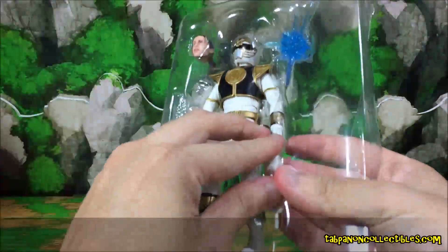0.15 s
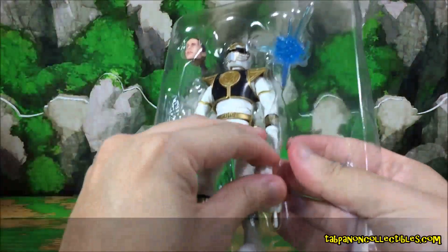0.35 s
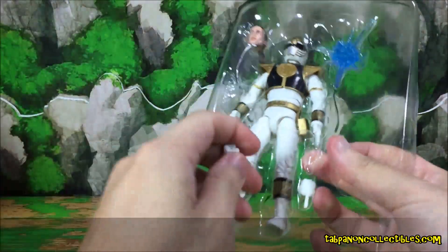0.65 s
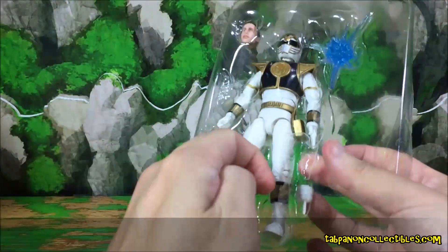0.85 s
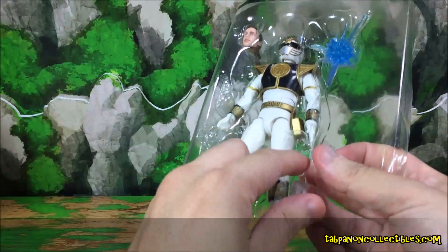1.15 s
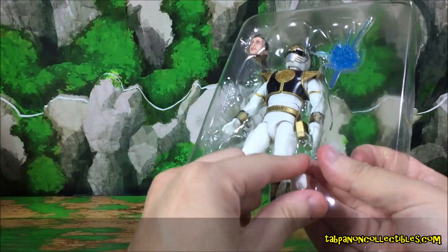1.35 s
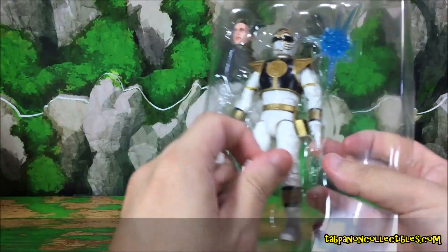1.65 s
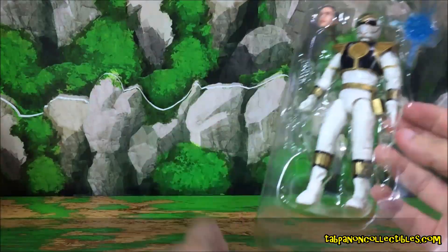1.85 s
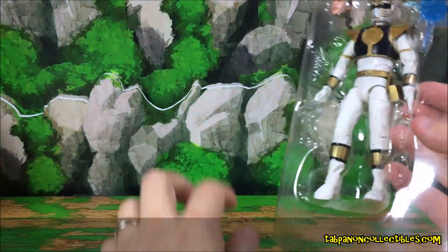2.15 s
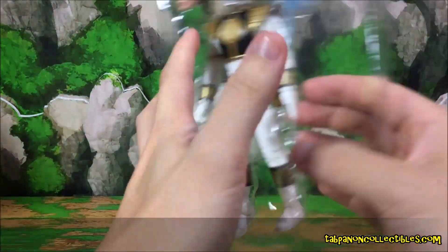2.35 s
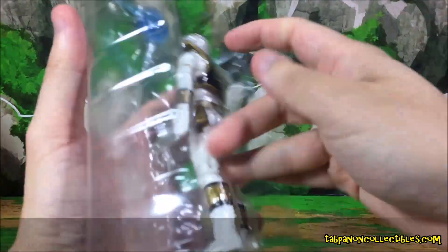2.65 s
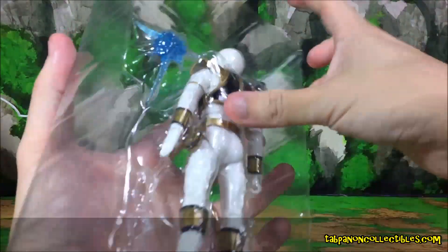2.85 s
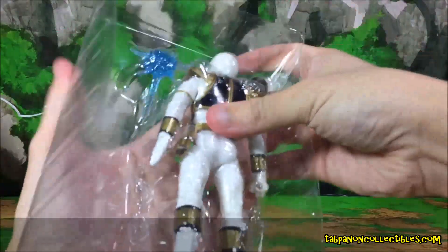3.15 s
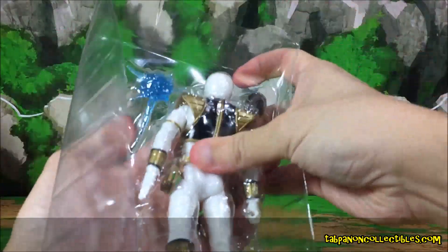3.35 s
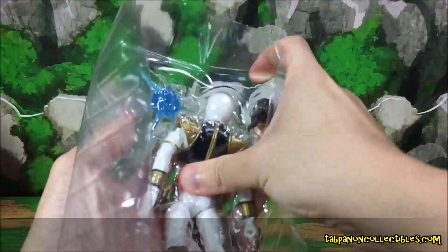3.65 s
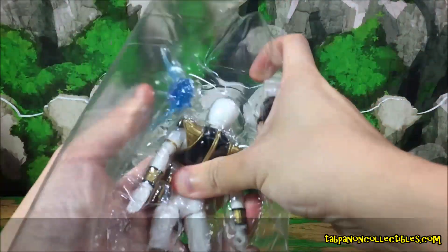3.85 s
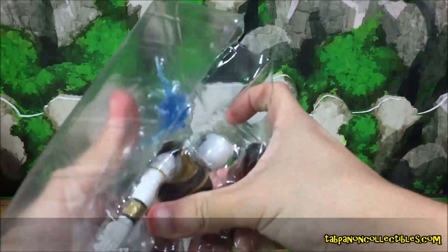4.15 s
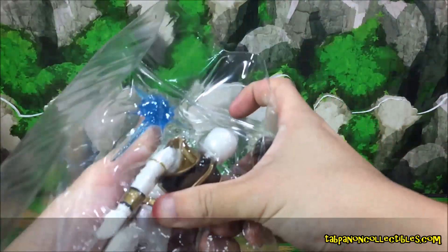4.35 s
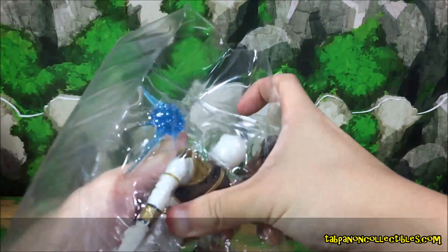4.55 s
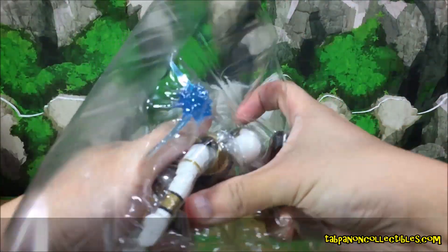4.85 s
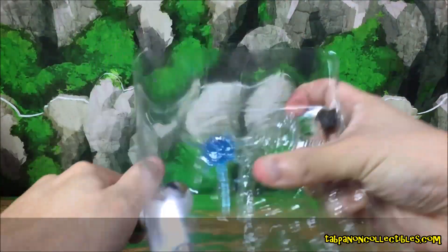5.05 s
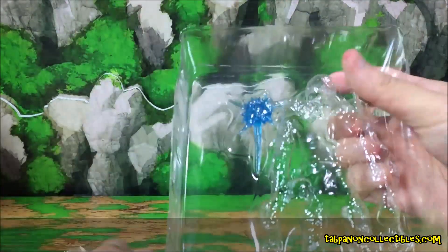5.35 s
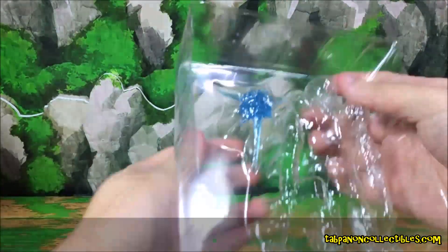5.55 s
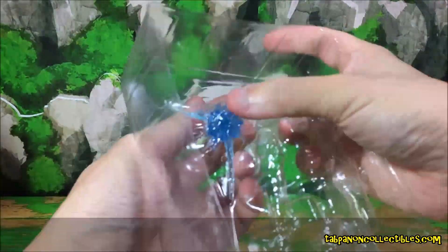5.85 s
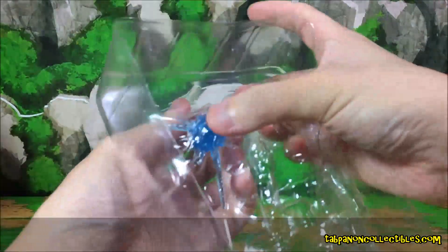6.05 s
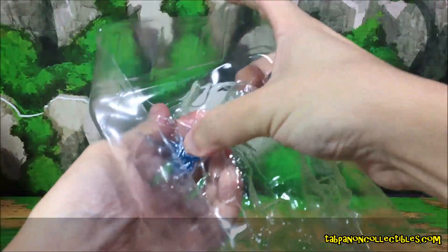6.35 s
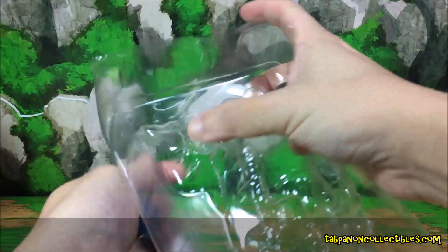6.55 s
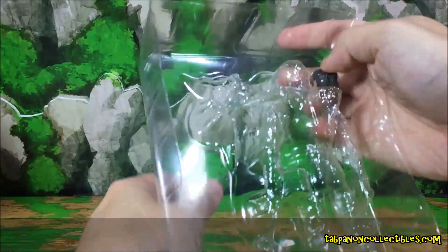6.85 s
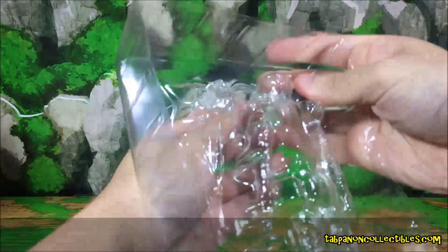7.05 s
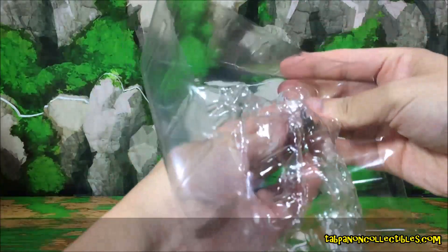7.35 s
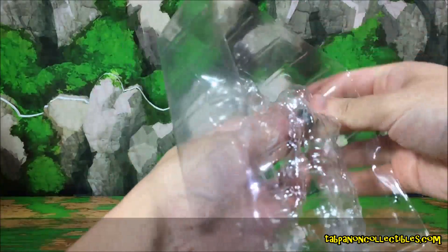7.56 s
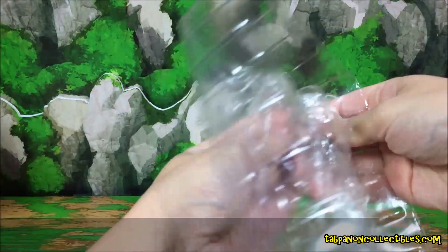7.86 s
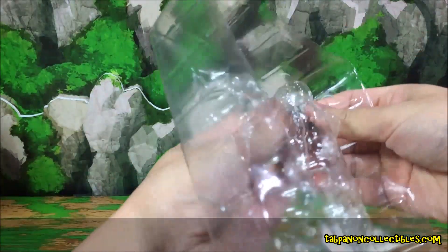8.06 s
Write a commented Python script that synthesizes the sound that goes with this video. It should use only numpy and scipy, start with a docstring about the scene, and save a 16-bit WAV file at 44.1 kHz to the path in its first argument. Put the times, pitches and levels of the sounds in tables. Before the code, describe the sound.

Hands bend a thin moulded plastic tray very close to the microphone in a quiet room. Bright crackles come first, a near lull follows, then scattered ticks and duller pops. Around three and a half to just over five seconds the snaps crowd together, loud and hollow, with low thumps. Afterwards separate sharp pops and small crackles continue to the end.

```python
"""A thin clear plastic tray, bent by hand close up indoors while a figure is pressed out of it.
Each dent snaps through as a burst of decaying band noise plus a short ring of three close sines.
Random tiny clicks make fine crackle between the snaps; resonators give the tray its hollow pitches.
Low noise thuds as the tray flexes, whole walls thump at low pitches, and a quiet room rumble lies below.
The loudest peaks are pushed into soft overload."""
import sys
import numpy as np
from scipy import signal
from scipy.fft import rfft, irfft
from scipy.io import wavfile

SR = 44100
rng = np.random.default_rng(int(sys.argv[2]) if len(sys.argv) > 2 else 0)


def store_wav(level_fs):
    """Save 16-bit WAV to argv[1]."""
    pcm = np.round(np.clip(np.atleast_2d(level_fs), -1, 1) * 32767)
    wavfile.write(sys.argv[1], SR, pcm.T.astype(np.int16))


N = 361619


def amp(db):
    """Turns dB into gain."""
    return 10 ** (np.asarray(db) / 20)


def rms_one(x):
    """Scales a signal to rms 1."""
    return x / np.sqrt(np.mean(x ** 2) + 1e-20)


def in_time(rows):
    """Draws each column of a timed table as a line with one value per sample."""
    s, *columns = np.transpose(rows)
    return [np.interp(np.arange(N) / SR, s, column) for column in columns]


def at_hz(points, hz):
    """Reads a table along a log-frequency axis."""
    table_hz, values = np.transpose(points)
    return np.interp(np.log(hz), np.log(table_hz), values)


def band(x, low_hz, high_hz):
    """Band-passes a signal."""
    return signal.sosfilt(signal.butter(2, [low_hz, high_hz], "band", fs=SR, output="sos"), x)


def dying(clicks, t60):
    """Starts at every click an envelope that falls 60 dB in t60 seconds."""
    return signal.lfilter([1], [1, -amp(-60 / (t60 * SR))], clicks + 1e-18)


def drift(rate_hz):
    """Slow random wander with rms 1: noise smoothed by two equal poles at rate_hz."""
    step = 40   # samples between the points of the wander
    r = np.exp(-2 * np.pi * rate_hz * step / SR)
    noise = rng.standard_normal(N // step + 2002)
    slow = signal.lfilter([1], [1, -2 * r, r * r], noise)[2000:]   # the run-in is dropped
    return np.interp(np.arange(N) / step, np.arange(len(slow)), rms_one(slow))


def tilt_db(hz, bass_db, treble_db):
    """Large dents sound fuller, small tight ones brighter; the tilt pivots at 2500 Hz."""
    octaves = np.log2(hz / 2500)
    bass = bass_db * np.clip(-octaves / 2.0, 0, 1.3)
    treble = treble_db * np.clip(octaves / 1.62, 0, 1.3)
    return bass + treble


# spectrum shape of the room noise: f/Hz, relative level/dB per Hz
ROOM_SPECTRUM = [(21, -31), (36, -1), (143, -1), (331, -23), (552, -19), (769, -27), (1280, -21),
                 (1650, -31), (3380, -36), (16000, -49)]
ROOM_DB = -53.5   # rms


def room():
    """Steady rumble and faint hiss: white noise shaped by the room's spectrum."""
    hz = np.maximum(np.fft.rfftfreq(N, 1 / SR), 1)
    shaped = irfft(rfft(rng.standard_normal(N)) * amp(at_hz(ROOM_SPECTRUM, hz)), N)
    return amp(ROOM_DB) * rms_one(shaped)


# the hands at work: t/s, fine crackle base level/dB, crackle treble tilt/dB, flexing thud base level/dB
HAND_MOVES = [(0.0, -39, 1, -44), (0.43, -49, 2.5, -63), (0.57, -42, 6.5, -57), (0.82, -60, -3, -53),
              (1.14, -57, -7, -60.5), (1.32, -39, -7, -53), (1.64, -55, -1.5, -61),
              (1.92, -50.5, -2.5, -55), (3.17, -34.5, -8.5, -47.5), (3.42, -24.5, 3.5, -62),
              (3.63, -16, -1.5, -62), (3.81, -31, -3, -44), (4.16, -31, -4.5, -50),
              (4.5, -36.5, -6.5, -45.5), (5.14, -25, -5, -33), (5.27, -45, -21, -38),
              (5.46, -47.5, -2, -56), (5.98, -43.5, -6, -50), (6.6, -38.5, -1, -48.5),
              (6.83, -47, -8.5, -54), (7.06, -40.5, 1.5, -49), (7.24, -36.5, -2, -47),
              (7.6, -41.5, -6.5, -56), (7.9, -51, -9, -50.5), (8.11, -41, -4, -48), (8.2, -49, -3, -46)]


def hands():
    """Moving hands set how much the sheet crackles, how bright that is, and how hard the tray thuds."""
    return in_time(HAND_MOVES)


JOLT_DB, JOLT_T60_S = -39, 0.11   # each snap shakes the whole tray; level relative to the snap


def thuds(level_db, lumpy_db):
    """The whole tray flexes and bumps against the fingers: lumpy low noise, stirred up by every snap."""
    level = amp(level_db) + amp(JOLT_DB) * dying(jolts(), JOLT_T60_S)
    low_noise = rms_one(band(rng.standard_normal(N), 53, 216))
    return level * amp(lumpy_db * drift(15)) * low_noise


def jolts():
    """One click per snap, scaled by the level of the snap."""
    s, snap_db = np.transpose(SNAP_EVENTS)[:2]
    clicks = np.zeros(N)
    clicks[(s * SR).astype(int)] = amp(snap_db)
    return clicks


# extra crackle before and after a snap, level relative to the snap
CREAK_DB, CREAK_T60_S = -19, 0.026
SETTLE_DB, SETTLE_T60_S = -31.5, 0.24


def stress():
    """The sheet is strained just before a dent snaps and settles after it: both free extra creases."""
    creak = dying(jolts()[::-1], CREAK_T60_S)[::-1]   # run backwards, so it swells into the snap
    settle = dying(jolts(), SETTLE_T60_S)
    return amp(CREAK_DB) * creak + amp(SETTLE_DB) * settle


def fine_crackle(level, per_s, spread_db, clump_db):
    """Tiny creases let go at random, in clumps, mostly faint and now and then strong."""
    sizes = amp(spread_db * np.minimum(rng.exponential(1, N), 4))
    born = rng.random(N) < per_s * amp(clump_db * drift(15)) / SR
    return level * sizes * born


# resonances of the hollow shape: f/Hz, width/Hz, mean level of the added mode/dB
HOLLOWS = [(338.6, 32, 4), (560, 99, 6), (903, 200, 4), (1231, 78, 0.5), (1435, 23, 0), (1815, 270, -5.5),
           (3275, 410, -7.5), (5900, 1100, -10.5)]


def tray(x):
    """The moulded hollows lift the same few pitches, each waxing and waning as fingers damp or free it."""
    out = x.copy()
    for hz, width_hz, level_db in HOLLOWS:
        r = np.exp(-np.pi * width_hz / SR)
        feed = (1 - r * r) / 2 * np.array([1, 0, -1])
        feedback = [1, -2 * r * np.cos(2 * np.pi * hz / SR), r * r]
        mode = signal.lfilter(feed, feedback, x)
        out += amp(level_db + 1.2 * drift(5.7)) * mode
    return out


CRACK_DB = 6.5   # crack gain over the snap level
LINGER_DB, LINGER_SPREAD_DB = -12.5, 3   # lingering part relative to the crack, and its chance spread
LINGER_TREBLE_DB, LINGER_PER_TREBLE = -4, -0.047   # it is duller; bright snaps linger less (dB per dB)
PATCH_DB, PATCH_OCTAVES = 4, 0.41   # the crack is strongest around the dent's own pitch
EDGES_HZ = 180 * 2 ** np.arange(0, 6.6, 1 / 3)   # third-octave bands
# colour of the sheet: f/Hz, relative level/dB per Hz
SHEET_SPECTRUM = [(220, -18.5), (400, -18), (700, -13), (1500, -11.5), (3000, -13), (6000, -12.5),
                  (10000, -14), (16000, -18)]
# decay of the crack: f/Hz, T60/s
CRACK_DECAY = [(220, 0.013), (1000, 0.0098), (4000, 0.014), (8000, 0.011), (16000, 0.0054)]
# decay of the lingering part: f/Hz, T60/s
LINGER_DECAY = [(220, 0.12), (1000, 0.088), (4000, 0.095), (16000, 0.072)]
# dents snapping through: t/s, snap level/dB before the part gains, ring f/Hz,
# ring level/dB relative to the snap, bass tilt/dB, treble tilt/dB
SNAP_EVENTS = [(0.0223, -27.5, 950, -6, -4, -17), (0.0573, -34, 9460, -3, 2.5, 13),
               (0.064, -20, 6140, -1, -17, 7), (0.0774, -31, 9280, -3, 6, 14),
               (0.0817, -19.5, 7130, -3, -10, 14.5), (0.0937, -18, 6330, 5, -11.5, 11),
               (0.1116, -25, 4410, 3, -18, 10), (0.121, -33, 5900, -3, -5, 23),
               (0.1483, -24, 6520, -3, -9, 4), (0.1603, -18, 8300, -3, 1, 18),
               (0.17, -31, 2260, -3, -3, -1), (0.2005, -27, 2360, -3, -2, -8),
               (0.2283, -13, 6570, -6, 6, 14), (0.2364, -3.5, 3170, -4, -5.5, 4),
               (0.2647, -10, 1930, -1, 3.5, -16.5), (0.304, -9.5, 4600, -2, 0, 5),
               (0.329, -18.5, 1160, -1, 0.5, -7.5), (0.3377, 1.5, 6000, -2, -16, 2),
               (0.3524, -6, 2790, 1, -18.5, -2), (0.3589, -3, 4100, 5.5, -8, -0.5),
               (0.3912, -19, 6150, 0, -5, 13), (0.4003, -18, 4500, -5, -7.5, -4.5),
               (0.4294, -28, 6630, -3, -7, 19), (0.447, -5, 1320, -3.5, 4, -2),
               (0.459, -21.5, 8730, -3, -11, 4), (0.487, -14, 6100, -7, 1, 0),
               (0.5236, -27, 9500, -1, 5, 20), (0.5336, -27, 3140, -3, 2, -1),
               (0.5438, -7.5, 6200, 2, 3, 18), (0.5508, -13.5, 1290, -7, 6, -23),
               (0.564, -22.5, 9500, -3, 4, -3), (0.5716, -26, 9270, -1.5, 0, 6),
               (0.6053, -29, 4630, -3, 12, -12), (0.6161, -11, 930, -1.5, -7, -1),
               (0.653, -13, 6260, -1, -9, 11), (0.6977, -26, 9420, 0, -2, 4),
               (0.705, -34, 9360, -3, -2, 13), (0.71, -16, 6230, -3, -5, 8),
               (0.7755, -32, 1270, 1, 23, -24), (0.8083, -33.5, 9500, -3, 18, 28),
               (0.8827, -42, 565, 5, 29, -7), (0.9106, -45, 1000, 0, 11, -1),
               (0.9303, -48, 1110, 3, 12, -15), (0.9564, -57, 3040, -3, 2, -10),
               (1.1214, -22, 1320, 5, 5.5, -17), (1.137, -29, 3940, -1, 3, 8),
               (1.157, -32, 6160, -1, 2, 16), (1.1704, -16, 9300, 1, -2, 33), (1.184, -31, 1340, 0, -3, -9),
               (1.1865, -17, 9500, 2, 1, 11), (1.1951, -19, 2460, -8, 1, -7),
               (1.2063, -27.5, 6500, 2, 0, 1), (1.2797, -30, 5570, 4, -10, -10),
               (1.3075, -15.5, 1240, 4, 5, -14), (1.329, -28, 1740, -1, 7, 13),
               (1.346, -28, 8900, 6, 8, 20), (1.373, -25, 4710, -3, -6, 12),
               (1.3772, -28.5, 1450, -6, 11, -11), (1.3906, -18, 6320, 4, -2, 18),
               (1.4327, -19, 1850, -3, -3, -13), (1.443, -5, 7200, -2, -4, -2.5),
               (1.45, -9.5, 5790, -5, -5, 12), (1.4826, -26, 5890, -3, 3, 1),
               (1.4934, -21, 6640, -3, -9, 3), (1.4959, -11.5, 4100, -5, -8, 2.5),
               (1.5039, -15, 5500, 1, -10, 2), (1.521, -18.5, 2590, -6, 4, -15),
               (1.534, -20, 4260, 3, -19, 0), (1.5649, -45, 1540, -3, 4, -11),
               (1.597, -19.5, 1990, -5, 2, -31), (1.6568, -18, 5390, 2, 4, 0),
               (1.667, -22.5, 1260, 1, -5, -1), (1.6736, -17, 3200, 0, -10, 8),
               (1.681, -23, 6640, -1, -15, 6), (1.6953, -8.5, 6350, 7, -15, 7),
               (1.7182, -16.5, 6300, -3, 7, 8), (1.726, -21, 950, 1, 9, 16), (1.743, -17, 6220, -3, -15, 2),
               (1.756, -21, 7280, -6, 0, 5), (1.7631, -17, 8540, -3, 2, 5),
               (1.777, -15.5, 8600, -1, -3, 14), (1.8252, -15, 1900, -6, 5, -14),
               (1.8344, -21.5, 1390, -11, 1, -13), (1.896, -20.5, 6500, 2, -11, 12),
               (1.941, -40, 9600, 1, -9, 25), (1.9917, -20, 6000, -5, 2, 14),
               (2.0527, -32, 3400, -3, -7, -1), (2.0629, -21, 2340, -3, 0, -14),
               (2.0741, -16.5, 1890, -13, -8, -9), (2.1652, -21.5, 1300, 0, -6, -13),
               (2.215, -38, 1950, -1, -11, -11), (2.2232, -25.5, 1980, -3, -17, -10),
               (2.2539, -33.5, 2360, -3, -5, -51), (2.3274, -34, 1980, 0, -8, -13),
               (2.358, -32.5, 1920, -3, -10, -21), (2.3936, -2.5, 2280, -14, 1.5, -11),
               (2.4966, -12, 1380, -6, 10, -15), (2.4992, -12, 594, 6, 12, -5),
               (2.52, -9.5, 1170, -6, 11, -16), (2.5441, -3.5, 980, -6, 0, -18),
               (2.5867, -3.5, 2300, -5, 0.5, 4), (2.6092, -16.5, 1380, -3, 6, -15),
               (2.6728, -1, 2100, -7.5, 1.5, -7), (2.851, -20, 3080, -6, -4, -9),
               (2.8678, -8.5, 2320, -4, -1.5, -7.5), (2.8946, -20, 2110, 2, -2, -33),
               (2.905, -13.5, 960, -7, -2, -25), (2.92, -24, 2250, -1, -14, -15),
               (2.931, -18, 2960, -5, -7, -3), (2.9619, -8, 1800, 5, 1.5, -1),
               (3.0168, -42, 1080, 5, 16, -20), (3.0958, -25, 2350, -3, 8, 0),
               (3.1138, -25, 1440, -5, 5, 4), (3.155, -18, 2070, -3, 2.5, -5),
               (3.1749, -2, 2110, -3.5, 10, 11), (3.1934, -7.5, 2220, -3, 9, 6),
               (3.2331, -18.5, 3530, -8, 1, -3), (3.249, -9.5, 6090, -5, -5, -4),
               (3.2648, -15, 1700, -5, 12, 5), (3.2724, -16.5, 3100, 2, -4, 5),
               (3.3113, -29, 9400, -3, -5, 8), (3.3237, -7.5, 2140, -1, -2.5, 1.5),
               (3.3373, -16, 6830, -1, -15.5, 38), (3.3594, -6.5, 5720, -7, -20, -4),
               (3.3776, -22, 1930, -3, -10, -6), (3.3845, -13, 6400, -3, -7, 13),
               (3.4064, -10, 1220, 0, -1, -6), (3.4217, -12.5, 6800, -1, -9, 2),
               (3.4252, -17, 2130, 2, -9, -11), (3.4477, -13, 2200, 2, 1, -8),
               (3.4548, -10, 1270, -10, -3, -21), (3.467, -13, 2020, -3, 2.5, -24),
               (3.48, -6, 8000, 1, -2, 4.5), (3.4927, -3.5, 3130, 3, -8.5, -15),
               (3.5072, -2.5, 5360, 0, -16, 9), (3.5224, -6, 5180, -1, 4, 2.5),
               (3.5485, -6, 1310, -3, 0, 2), (3.5672, 2, 6300, 8, -37, -7), (3.59, -8, 7010, -3, -16, 14.5),
               (3.6062, -13, 7040, -3, 0, 13), (3.6102, -8, 8400, 1, 2, 12),
               (3.6265, -4.5, 4370, -6, -11, -16), (3.6424, -0.5, 6520, 0, -10, 0),
               (3.6659, -5, 5530, 1, -6, 3), (3.6893, 1.5, 960, 1, 2.5, -9.5),
               (3.7031, -0.5, 2700, -3, -16, 1), (3.7123, -9, 5400, -3, 5, -9),
               (3.7194, -2, 5970, 0, -10, 0), (3.7265, 1, 8800, 3, -18, 0), (3.741, -11, 9470, -3, -3, 5),
               (3.7709, -6.5, 6100, -1, -16, 0), (3.7916, -1, 8930, -4.5, -1, 0),
               (3.7949, -1, 4500, -4, -15, -15), (3.8301, -4, 5560, -4, -1, 4.5),
               (3.846, -1.5, 8400, 5, 4, 4), (3.8544, -1, 5350, -11, -1, -2), (3.91, -9, 3650, 0, 10, 11),
               (3.9181, 7, 2540, -4.5, -14, -4), (3.93, -8, 6570, -1, 0, 7), (3.942, -7.5, 2250, 4, 9, 0),
               (3.9564, -4.5, 5730, -6, -3.5, -2), (3.9686, -12, 6210, -6, 2, -5),
               (3.9784, 1.5, 6470, -9, 1, 0), (3.9949, 11, 3050, -3, -2, -4),
               (4.0578, -8.5, 1260, 2, -3, -24), (4.0743, -8, 710, 4, 10, -32),
               (4.132, -16.5, 2090, 1, 13, -31), (4.1992, -8, 1900, 0, 7.5, 2),
               (4.2052, -2.5, 4230, 1, 3, -6), (4.2105, -8, 1950, 3, -3, -2), (4.2218, -5, 8600, 5, -17, 2),
               (4.2297, 0.5, 4070, 6, -11.5, -4), (4.2482, -15, 3370, -1, 5, 0),
               (4.258, -16, 5560, -3, 12, 1), (4.2667, -14, 9210, -3, -2, 7), (4.2898, -9, 2410, 2, -8, -1),
               (4.3355, -32, 4610, -3, -17, -1), (4.349, -9, 5500, -1, -29, 6),
               (4.381, -15, 1810, 2, -2, -11), (4.3897, -14.5, 2410, -2, 7, 2),
               (4.4012, -6.5, 2080, 4, 8, -16), (4.4198, -6.5, 4560, -4, -24, -7),
               (4.427, -12, 3910, 6, -15, -8), (4.445, -2, 1710, -16, -15, -25),
               (4.465, -16, 1940, -3, 16, -13), (4.478, -14, 1730, -1, -15, -15),
               (4.492, -13, 864, -5, 10, -9), (4.5574, -20, 8100, -3, -13, 25),
               (4.5673, -7, 5950, -3, -7, 0), (4.579, -15, 6720, 2, -11, -3), (4.598, -24, 1960, 1, 4, -3),
               (4.6482, -9.5, 1890, 2, 1, -4), (4.6752, -12.5, 1790, 0, -11, -10),
               (4.681, -1.5, 8900, 3, 1, 17), (4.706, -2.5, 1800, 1, -32, -1),
               (4.7533, 9.5, 5340, 1, -6, -6.5), (4.7695, -5.5, 995, -13, 2, -9),
               (4.778, -9, 1490, 3, -9, -9), (4.8597, -6.5, 3070, -9, 2, -1.5),
               (4.8717, -18, 4540, 1, 0, 2), (4.8951, -5.5, 9850, 1, -28, 7),
               (4.9222, -15, 2370, 1, -6, -20), (4.932, -25, 2270, -3, -10, -8),
               (4.9555, -15.5, 5760, 2, -4, 13), (4.9698, -18.5, 1500, 6, 6, -18),
               (4.984, -23, 1590, -6, -8, -10), (5.0046, 1, 5630, -2, -6.5, -11),
               (5.0165, 5.5, 1610, -1, -5, -19), (5.021, 2.5, 2420, -4, -11, -11),
               (5.036, -8, 1290, -2, 7, -6), (5.041, -4.5, 8160, -5, -2.5, 3),
               (5.056, -4.5, 3030, -6, -13, -11), (5.0794, 1.5, 1510, 0, -4, -15.5),
               (5.0832, 3, 5390, -3, 2, 14), (5.1012, -6.5, 5470, -2, -7, 0),
               (5.1318, -5, 3700, -4, -5, -4), (5.1396, 4, 5260, -5, 10, -1.5),
               (5.1621, -7.5, 3650, 0, 2, -7), (5.1757, -7, 3610, -3, 5, 6), (5.1878, 2, 3120, 0, 4, -4),
               (5.1965, 5.5, 3260, 4, -7, 0), (5.2138, 12.5, 1390, 0, -3, 3), (5.2306, 12, 4080, -1, 0, 0),
               (5.2656, -4, 3640, 1, 1.5, 3), (5.2927, -7, 3980, -4, -16, -2),
               (5.305, -29, 7820, -3, -6, 10), (5.317, -18, 5800, 1, -10, 15),
               (5.353, -15.5, 960, 6, 7.5, -26), (5.4483, 8, 2150, -4, -3.5, -8),
               (5.5324, -13.5, 2280, 2, 4, -22), (5.6218, -21.5, 1080, 2, 9, -23),
               (5.643, -7, 1420, 1, 6, -6), (5.645, 15, 4070, -4, -9, 2), (5.7903, -30, 9180, -5, 12, 7),
               (5.828, -41, 5620, -3, 6, -1), (5.8562, -29, 4390, 1, -7, 2),
               (5.8698, -14.5, 3320, -9, 1, 0), (5.9634, -31, 7240, -3, -2, -2),
               (5.9773, -30, 3280, -3, -8, 5), (5.9843, -6, 2300, 0, 5, -2),
               (6.0552, -16, 5490, -7, -12, 13), (6.1007, -32, 800, -3, 6, -4),
               (6.1373, -39, 510, -1, 21, -17), (6.2, -27.5, 585, -7, 25, -13),
               (6.258, -24, 5230, -1, -7, 11), (6.2655, -19, 3510, 1, -3, 6),
               (6.2882, -9, 3680, 4, -11, 6.5), (6.3062, -24, 3290, 6, -3, 4), (6.3366, 4, 5500, 4, -11, 0),
               (6.365, -5, 2980, -5, -2.5, -3), (6.3725, -11, 3360, 4, 4, 8.5),
               (6.3936, -19.5, 1600, 3, 9, -28), (6.4145, -14, 8160, -1, -11, 14),
               (6.4216, -1.5, 8600, 1, -6, 13), (6.4502, 0.5, 734, -3.5, 0, 3),
               (6.4548, 7.5, 8000, 4, 5, 6.5), (6.5929, -34, 900, 5, -2, -15),
               (6.6264, -10, 3700, 1, -2, -15), (6.632, -2.5, 2070, -12, 13, -7),
               (6.642, -14.5, 1100, 9, 6, -27), (6.6751, 1, 4030, 10, -17, -3),
               (6.6948, -2.5, 2400, 2, 3, -10), (6.711, -11, 6880, -3, 4, -5),
               (6.7193, -7, 2420, -3, -5, -10), (6.7244, -1, 8900, 0, -1, 3),
               (6.7658, -14.5, 1190, -3, 4, -10), (6.7735, -1.5, 1220, -2.5, 2, -24),
               (6.8022, -11, 1960, -7, -11, 6), (6.8184, -15.5, 7900, -10, -3, 22),
               (6.979, -23, 9500, 0, 7, 9), (7.0401, 0, 1280, -1.5, -3, -3), (7.0885, -11, 2190, 0, 2, -21),
               (7.1034, -13, 970, 3, 12, -1), (7.1296, -1.5, 6200, -5, 1.5, 2),
               (7.2137, -22, 2920, -5, 8, -5), (7.225, -26, 1300, 0, 4, -9), (7.248, -13, 5400, -12, 7, 1),
               (7.2582, -16, 3750, -5, 8, 7), (7.2742, -20.5, 576, 0, 12, -16),
               (7.285, -6.5, 2180, -1, 4, -30), (7.3171, -14, 555, -3, 5, 1), (7.3317, -14, 3550, -5, 2, 4),
               (7.3608, 0.5, 2060, 0, -9, -14), (7.4193, 1, 3220, -4, -11, -0.5),
               (7.4317, -18, 2800, 0, -13, -35), (7.5282, -6.5, 1930, -1, -0.5, -10.5),
               (7.572, -32.5, 3240, 5, 9, -32), (7.5846, -41, 920, -5, 12, -15),
               (7.598, -31, 910, -3, 5, -24), (7.639, -22, 8510, -3, -6, -1),
               (7.644, -17.5, 9350, 0, -5, 3), (7.657, -9, 1350, 2, -8, -22),
               (7.663, -2.5, 2000, 6, 3, -0.5), (7.709, -16, 1270, -3, 24, -27),
               (7.7235, -25, 5330, 1, 26, 7), (7.891, -24, 3400, 2, -9, -19), (7.8989, -19, 8870, -1, 1, 1),
               (7.9278, -21, 1860, 1, 5, -12), (7.9384, -9.5, 4510, -6, -4, 3),
               (7.9605, -9.5, 1780, -5, 4, -21), (7.9711, -4.5, 1850, 0, 6, -9),
               (7.9799, -20, 647, 4, -2, -10), (8.0022, -3.5, 1300, -2.5, -3, -2),
               (8.028, -17.5, 2350, 0, -2, -16), (8.075, -15, 1890, -1, 3, -13),
               (8.079, -19.5, 4050, 1, 14, -8), (8.1046, -5.5, 7300, -8, -2, -1),
               (8.1427, -13.5, 2030, 4, 4.5, -41)]


def sheet(crackle, crackle_treble_db):
    """The sheet has too many modes to count: in each band a crack dies fast and a weaker part lingers."""
    s, snap_db, ring_hz, _, bass_db, treble_db = np.transpose(SNAP_EVENTS)
    at = np.minimum((s * SR).astype(int), N - 1)
    out = np.zeros(N)
    white = rng.standard_normal((2, N))   # neighbouring bands take turns with two noises
    chance = rng.normal(0, 1, (len(at), len(EDGES_HZ)))   # no two dents stir the same modes
    crease_db = 4.1 * rng.standard_normal((2, N))
    crease_treble_db = crackle_treble_db + crease_db[1]
    centres = np.sqrt(EDGES_HZ[1:] * EDGES_HZ[:-1])

    tilts_db = tilt_db(centres, bass_db[:, None], treble_db[:, None])
    octaves_off = np.log2(centres / ring_hz[:, None])
    tilts_db = tilts_db + PATCH_DB * np.exp(-(octaves_off / PATCH_OCTAVES) ** 2)
    # tilt and patch leave the power of a snap alone
    share = amp(2 * at_hz(SHEET_SPECTRUM, centres)) * centres
    power = amp(2 * tilts_db) @ share / share.sum()
    tilts_db = tilts_db - 10 * np.log10(power)[:, None]
    linger_db = LINGER_DB + LINGER_PER_TREBLE * treble_db + LINGER_SPREAD_DB * chance[:, -1]

    for k, (low, high, hz) in enumerate(zip(EDGES_HZ, EDGES_HZ[1:], centres)):
        strength = amp(snap_db + CRACK_DB + tilts_db[:, k] + 2.97 * chance[:, k])
        # each crease has its own colour
        crease_colour_db = tilt_db(hz, crease_db[0], crease_treble_db) + 0.5 * white[(k + 1) % 2]
        small = crackle * amp(crease_colour_db)
        crack, linger = small.copy(), small * amp(-19)
        np.add.at(crack, at, strength)
        np.add.at(linger, at, strength * amp(linger_db + tilt_db(hz, 0.069, LINGER_TREBLE_DB)))
        tick = amp(-3.5) * dying(crack, 0.00082)   # the instant of letting go
        body = dying(crack, at_hz(CRACK_DECAY, hz))
        tail = dying(linger, at_hz(LINGER_DECAY, hz))
        noise = (tick + body + tail) * white[k % 2]
        out += amp(at_hz(SHEET_SPECTRUM, hz)) * band(noise, low, high)
    return out


def rings():
    """The freed patch of each dent swings briefly, in three neighbouring modes that beat roughly."""
    cycles, least_s, spread = 20, 0.004, 0.05   # T60 in cycles plus a least time; log spread of pitch
    length = 2000
    out, t = np.zeros(N + length), np.arange(length) / SR
    chance = rng.standard_normal((len(SNAP_EVENTS), 3, 1))
    detune = np.exp(spread * chance * [[0], [1], [1]])   # the first mode stays on pitch
    for (s, snap_db, ring_hz, ring_db, *_), near in zip(SNAP_EVENTS, detune):
        t60 = least_s + cycles / ring_hz
        envelope = (1 - np.exp(-t * ring_hz)) * amp(-60 * t / t60)
        swing = envelope * np.sin(2 * np.pi * ring_hz * near * t).mean(0)
        start = int(s * SR)
        out[start:start + length] += amp(snap_db + ring_db) * swing
    return out[:N]


THUMP_T60_S = 0.11
# tray walls flipping over: t/s, level/dB before the swing's envelope, f/Hz
WALL_FLIPS = [(0.442, -32.5, 300), (1.437, -24, 300), (2.065, -21, 120), (2.393, -27.5, 278),
              (2.492, -17, 275), (2.582, -21.5, 155), (2.667, -21.5, 297), (3.162, -25.5, 258),
              (3.849, -21, 283), (3.916, -21.5, 253), (3.987, -15, 215), (4.198, -23, 260),
              (4.402, -19, 140), (4.648, -20.5, 160), (4.749, -12, 238), (5.02, -10.5, 115),
              (5.136, -21, 296), (5.186, -7, 142), (5.451, -26, 314), (5.64, -21.5, 326), (6.362, -24, 137),
              (6.451, -12.5, 161), (6.629, -11, 130), (6.771, -18, 318), (7.363, -26, 259),
              (7.962, -27, 288)]


def thumps():
    """A whole wall of the tray flips and shakes briefly at a low pitch, with a softened onset."""
    length = 12000
    out, t = np.zeros(N + length), np.arange(length) / SR
    for s, level_db, hz in WALL_FLIPS:
        envelope = (1 - np.exp(-t * hz * 1.2)) * amp(-60 * t / THUMP_T60_S)
        swing = envelope * np.sin(2 * np.pi * hz * t)
        start = int(s * SR)
        out[start:start + length] += amp(level_db) * swing
    return out[:N]


def scene():
    """Mixes the tray in the hands with the room."""
    crackle_db, treble_db, thud_db = hands()
    crackle = fine_crackle(amp(crackle_db) + stress(), per_s=220, spread_db=3.5, clump_db=4.0)
    plastic = tray(sheet(crackle, treble_db)) + rings() + thumps()
    return (plastic + thuds(thud_db, lumpy_db=3.5) + room())[None]


CUTOFF_HZ = 16700   # from here up everything is at least 80 dB down


def record(dry):
    """The microphone overloads softly, flattening the loudest peaks below 1, and the top is cut."""
    clipped = dry / (1 + np.abs(dry) ** 6) ** (1 / 6)
    return signal.sosfilt(signal.cheby2(20, 80, CUTOFF_HZ, fs=SR, output="sos"), clipped)


dry = scene()
out = record(dry)
store_wav(out)
```